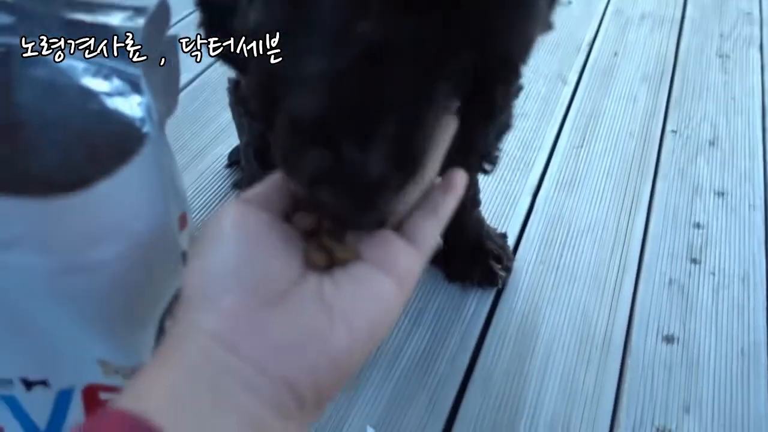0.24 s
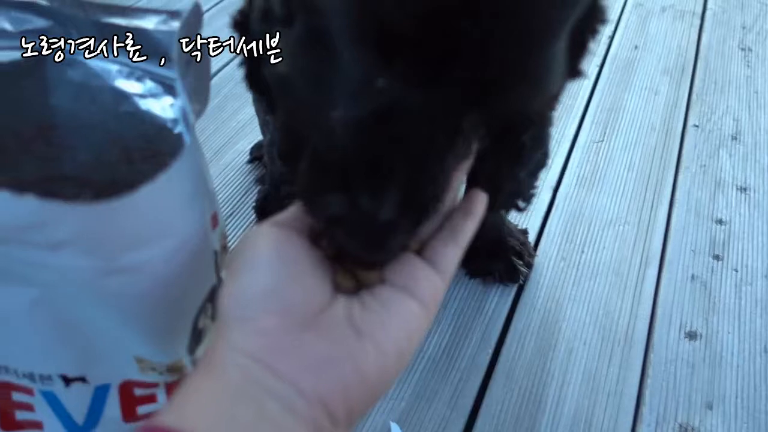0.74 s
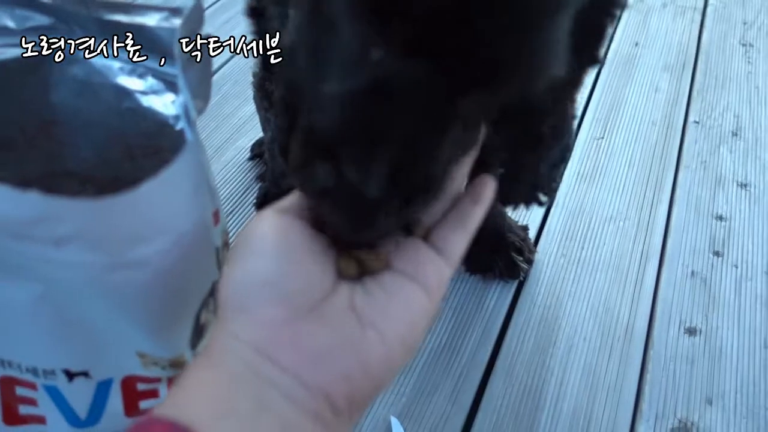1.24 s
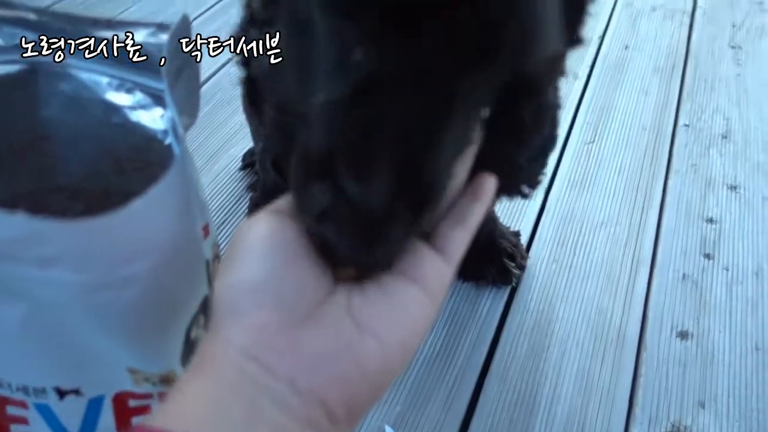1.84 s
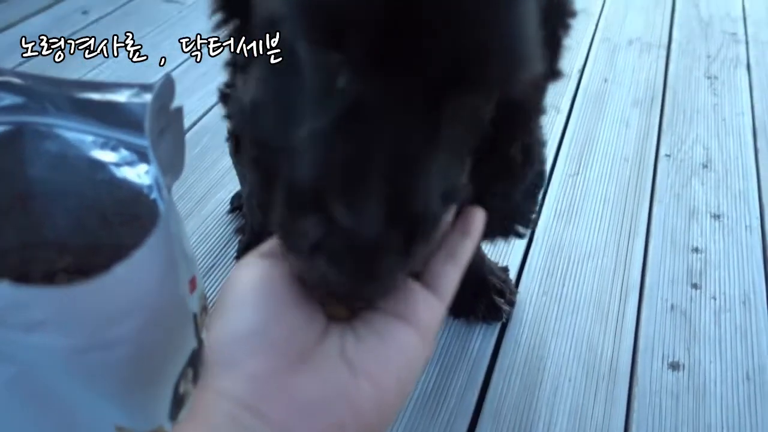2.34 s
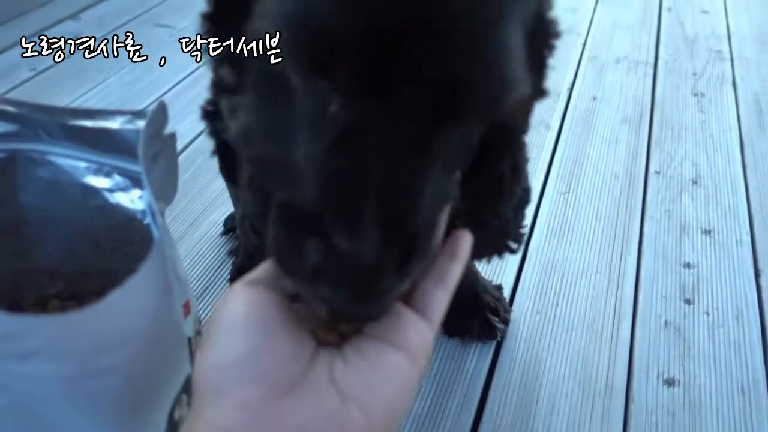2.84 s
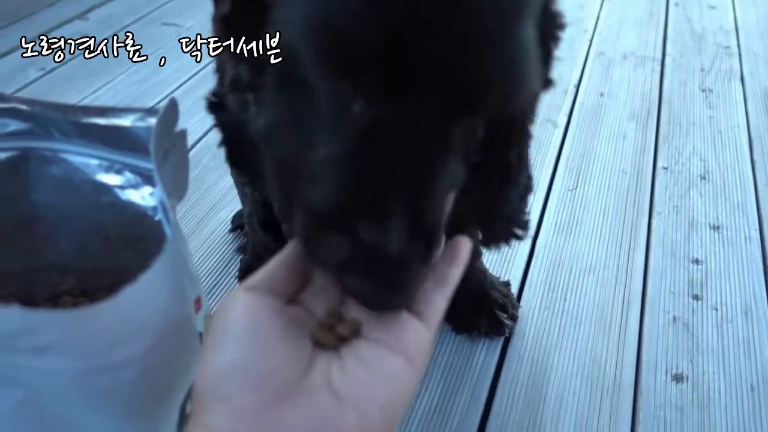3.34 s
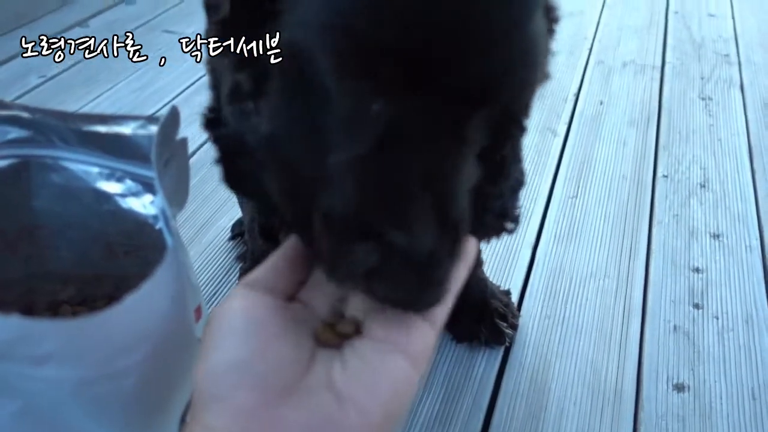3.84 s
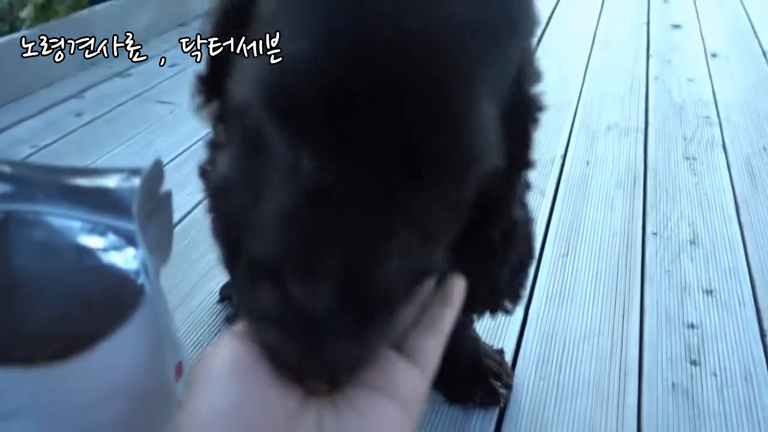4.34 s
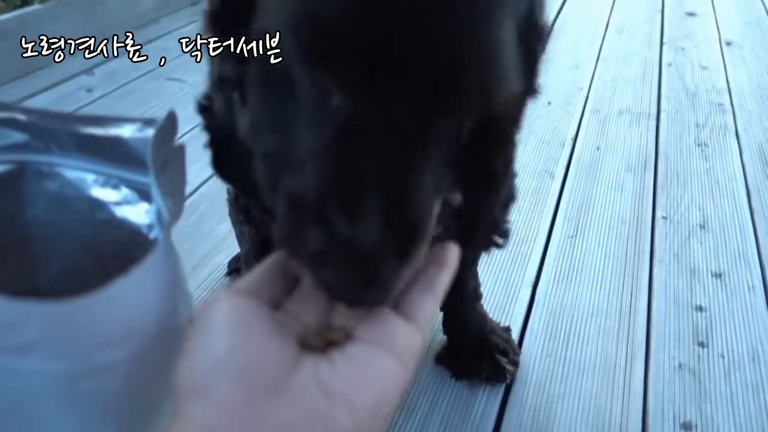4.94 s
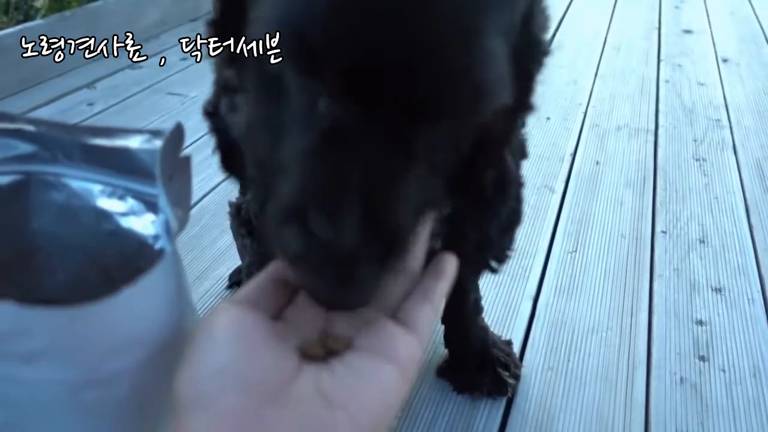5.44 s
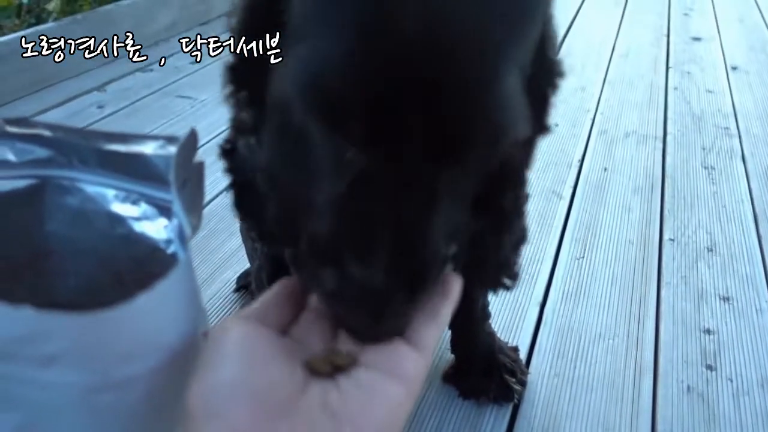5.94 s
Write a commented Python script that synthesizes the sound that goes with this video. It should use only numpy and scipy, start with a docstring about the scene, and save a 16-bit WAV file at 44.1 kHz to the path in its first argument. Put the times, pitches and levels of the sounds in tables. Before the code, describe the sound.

Crisp, close crunches and small wet mouth crackles of a dog eating kibble outdoors, over a soft wash of far traffic.

```python
"""Crisp, close crunches of dry kibble stand out in front throughout: a dog eats from a hand on a wooden deck.
Each bite is a burst of splinter noise ringing resonances of the mouth, cheeks, teeth and jaw.
Around and between the bites run short crackles, built from many tiny decaying sines.
Boards and walls answer with a faint tail of fading noise. Behind lies distant traffic, made of shaped
noise, with a brief far engine hum of harmonics and a thin whine of narrow noise."""
import sys
import numpy as np
from scipy import signal
from scipy.fft import rfft, irfft, next_fast_len
from scipy.io import wavfile
from scipy.ndimage import uniform_filter1d, map_coordinates

SR = 44100
rng = np.random.default_rng(int(sys.argv[2]) if len(sys.argv) > 2 else 0)


def generate_wav(sig):
    """Save sig (samples, or channels by samples) to the path in sys.argv[1] as 16-bit PCM at SR."""
    pcm = np.round(np.clip(np.atleast_2d(sig).T, -1, 1) * 32767).astype(np.int16)
    wavfile.write(sys.argv[1], SR, pcm)


N = 273067  # length in samples


def amp(db):
    """Decibels to gain."""
    return 10 ** (np.asarray(db) / 20)


def unit(x):
    """Scale x to rms 1."""
    return x / np.sqrt(np.mean(x ** 2) + 1e-20)


def along(points, hz):
    """Read a curve of (f/Hz, value) points on a log frequency axis."""
    f, value = np.transpose(points)
    return np.interp(np.log(hz + 1), np.log(f + 1), value)


def curves(rows):
    """One value per sample for each column after the time."""
    t, *columns = np.transpose(rows)
    return [np.interp(np.arange(N) / SR, t, column) for column in columns]


def wobble(rate):
    """A smooth random curve through `rate` knots a second."""
    knots = rng.standard_normal(int(N * rate / SR) + 4)
    return map_coordinates(knots, [np.arange(N) * rate / SR])


def filtered(x, response):
    """Apply a response, given as a function of frequency in Hz."""
    size = next_fast_len(N + SR // 2)
    hz = np.fft.rfftfreq(size, 1 / SR)
    return irfft(rfft(x, size) * response(hz), size)[..., :N]


def causal(gain):
    """The minimum-phase response with this gain: it rings only after the blow."""
    cepstrum = irfft(np.log(gain + 1e-6))
    half = len(cepstrum) // 2
    folded = np.r_[cepstrum[0], 2 * cepstrum[1:half], np.zeros(half)]
    return np.exp(rfft(folded))


def add(track, t, sound):
    """Mix a sound into a track from time t on."""
    start = round(t * SR)
    lo, hi = max(start, 0), min(start + sound.shape[-1], N)
    track[..., lo:hi] += sound[..., lo - start:hi - start]


# likeness of left and right in the traffic: f/Hz, correlation
STEREO_LIKENESS = [(60, 0.52), (140, 0.94), (350, 0.98), (830, 0.87), (2000, 0.35), (4800, 0.026),
                   (11500, 0.043)]
# the traffic's lean to the left: f/Hz, left minus right level/dB
TRAFFIC_LEAN = [(190, 0), (620, 2), (2000, 4.5), (3600, 0.2), (6400, 0)]


def rush(spectrum, patchy_db):
    """Stereo noise, its middle at rms 1, with patches of random gain; it is widest in the treble."""
    grid = signal.stft(rng.standard_normal((2, N)), nperseg=512)[2]
    patches = uniform_filter1d(rng.standard_normal(grid.shape[1:]), size=4, axis=0)  # across frequency
    patches = uniform_filter1d(patches, size=18, axis=1)  # across time
    pair = signal.istft(grid * amp(patchy_db * unit(patches)), nperseg=512)[1][:, :N]

    def mid_and_side(hz):
        turn = np.arccos(np.clip(along(STEREO_LIKENESS, hz), -1, 1)) / 2
        return amp(along(spectrum, hz)) * [np.cos(turn), np.sin(turn)]

    def lean(hz):
        return amp(np.outer([.5, -.5], along(TRAFFIC_LEAN, hz)))

    mid, side = filtered(pair, mid_and_side)
    return filtered(np.array([mid + side, mid - side]), lean) / np.std(mid)


# colours of the three traffic layers: f/Hz, relative level/dB per Hz
RUMBLE_COLOUR = [(15, -70), (25, -57), (80, -68), (113, -19.5), (177, -17), (220, -7), (360, -3), (461, 2),
                 (607, 1), (672, 1), (800, -5), (1040, -72), (1760, -120)]
TYRE_COLOUR = [(470, -37), (800, -6), (872, -3), (945, -1), (1090, -2), (1230, -2), (1330, -3.5),
               (1520, -3), (1860, -2), (2310, -7.5), (2520, -4), (3370, -11.5), (3700, -11), (4250, -9.5),
               (4500, -14), (5850, -55), (9900, -120)]
HISS_COLOUR = [(2650, -9), (4500, -0.5), (5320, -4.5), (6220, -5), (7220, -7), (10600, -10), (11200, -18),
               (14600, -65), (22000, -120)]
# slow rise and fall of rumble and tyre wash, before a small trim: t/s, level/dB
RUMBLE_RIDE = [(0.0, -66.5), (0.55, -64.5), (0.91, -65), (1.84, -62), (2.02, -59.5), (2.5, -62.5),
               (3.1, -58.5), (3.34, -57), (3.52, -56.5), (3.81, -58.5), (4.12, -59), (4.52, -57),
               (4.84, -61), (6.19, -61)]
TYRE_RIDE = [(0.0, -57), (0.4, -57), (1.74, -56.5), (1.9, -55.5), (2.36, -56), (3.19, -53.5), (4.46, -53.5),
             (4.59, -54.5), (5.07, -55), (5.34, -53.5), (6.19, -55)]


def traffic():
    """Distant traffic: low rumble and tyre wash that rise and fall, and an even hiss."""
    rumble_trim_db, tyre_trim_db, hiss_db = 0.5, -0.5, -67
    rumble = amp(curves(RUMBLE_RIDE)[0] + rumble_trim_db) * rush(RUMBLE_COLOUR, patchy_db=2.1)
    tyres = amp(curves(TYRE_RIDE)[0] + tyre_trim_db) * rush(TYRE_COLOUR, patchy_db=2.05)
    hiss = amp(hiss_db) * rush(HISS_COLOUR, patchy_db=2.4)
    return rumble + tyres + hiss


# the far engine's base pitch and its swell: t/s, f/Hz, level/dB before each harmonic's own
HUM_PATH = [(3.15, 135, -72), (3.3, 133, -54), (3.47, 128.3, -49), (3.6, 132, -79), (3.9, 126, -99)]
# the harmonics that sound: multiple of the base pitch, relative level/dB
HUM_HARMONICS = [(3, -6), (4, -12), (5, -14)]


def hum():
    """A far engine swells for a moment out of the traffic: unsteady harmonics of one wavering pitch."""
    pitch_hz, db = curves(HUM_PATH)
    phase = 2 * np.pi * np.cumsum(pitch_hz * (1 + 0.0038 * wobble(24.1))) / SR
    harmonics = sum(amp(level + 0.67 * wobble(7.2)) * np.sin(round(multiple) * phase)
                    for multiple, level in HUM_HARMONICS)
    return amp(db) * harmonics


# swells of the far whine over its resting level: t/s, level/dB before the lean to the left
WHINE_SWELLS = [(3.4, -65), (3.97, -64.5), (6.12, -59)]


def whine():
    """A thin, far whine comes and goes, leaning left: narrow noise under swells that fade in dB."""
    centre_hz, width_hz = 1835, 55
    rest_db, fade_db_per_s = -77, 48  # the fade runs on either side of a swell
    narrow = filtered(rng.standard_normal(N), lambda hz: 1 / (1 + ((hz - centre_hz) / width_hz) ** 4))
    t = np.arange(N) / SR
    swells = sum(amp(db - fade_db_per_s * np.abs(t - peak_s)) for peak_s, db in WHINE_SWELLS)
    return unit(narrow) * (amp(rest_db) + swells) * amp([[2], [-2]])


# how long boards and walls ring: f/Hz, time to fall 60 dB/s
DECK_DECAY = [(200, 0.42), (1500, 0.11), (5000, 0.12), (11000, 0.063)]


def deck(x):
    """A faint, short tail from boards and walls: noise that fades at its own rate in each band."""
    hz, t, grid = signal.stft(rng.standard_normal((2, SR // 3)), SR, nperseg=256)
    fade = amp(-60 * t / along(DECK_DECAY, hz)[:, None])
    tail = signal.istft(grid * fade, SR, nperseg=256)[1]
    return signal.fftconvolve(x, tail / np.linalg.norm(tail[0]), axes=1)[:, :N]


def clump(half_s, pitch_hz, size=160):
    """Tiny wet ticks and crumbs, each a few decaying cycles, thickest two half lengths in."""
    ticks_per_half_second, size_scatter_db, pitch_scatter = 3500, 4.5, .55  # count per second of half length
    t = np.arange(size) / SR
    count = int(ticks_per_half_second * half_s) + 2
    when, pitch, weight = rng.standard_normal((count, 3)).T
    hz = np.clip(pitch_hz * np.exp(pitch_scatter * pitch), 800, 10000)[:, None]
    grains = amp(size_scatter_db * weight)[:, None] * np.sin(2 * np.pi * hz * t) * np.exp(-hz * t / 3.1)
    start = ((2 + np.clip(.7 * when, -2, 2)) * half_s * SR).astype(int)
    ticks = np.bincount((start[:, None] + np.arange(size)).ravel(), grains.ravel())
    return ticks / np.linalg.norm(ticks) * np.sqrt(2 * half_s * SR)  # rms 1 over two half lengths


# short crackles around and between the bites: tongue strokes, grinding crumbs and small lead-in cracks:
# middle t/s, half length t/s, level/dB before the lips' colour, f/Hz
MOUTH_CRACKLES = [(0.131, 0.02, -52, 3470), (.252, .025, -49, 3180), (0.682, 0.0069, -49, 4060),
                  (0.89, 0.013, -48.5, 2380), (1.18, .016, -51.5, 2480), (1.405, .002, -39.5, 2320),
                  (1.863, 0.0095, -49, 2650), (1.962, 0.0097, -45.5, 3430), (2.004, .018, -51.5, 2980),
                  (2.535, 0.036, -50, 1780), (2.964, 0.01, -48.5, 2740), (3.047, 0.016, -44.5, 3000),
                  (3.177, 0.022, -51.5, 1770), (3.371, .012, -57, 6140), (3.431, .003, -47.5, 4140),
                  (3.703, .003, -48, 2700), (4.021, 0.0076, -44, 1800), (4.119, .003, -44, 1400),
                  (4.274, 0.0061, -46.5, 2840), (4.382, 0.03, -52, 2370), (4.826, 0.011, -46, 2970),
                  (5.305, .003, -42, 2920), (5.347, .008, -48, 3240), (5.489, 0.022, -50, 5500),
                  (5.59, 0.037, -50, 4130), (5.584, 0.035, -47.5, 1080), (6.005, 0.013, -51.5, 3080)]
# the lips' colour on the crackle: f/Hz, level/dB
LIPS_COLOUR = [(100, -45), (700, -20), (1050, 0), (1500, -8), (2500, 2), (4600, -1.5), (7000, -3.5),
               (8500, 1), (11000, -13)]


def crackles():
    """Tongue strokes, grinding crumbs, small lead-in cracks and each bite's crumbs pass through the lips."""
    out = np.zeros(N)
    for t, half_s, db, pitch_hz in MOUTH_CRACKLES:
        add(out, t - 2 * half_s, amp(db) * clump(half_s, pitch_hz))
    # crumbs are louder after a hard bite and after a crumbling one, and pitched by the cheeks
    lag_s, half_s, pitch_over_cheek = .007, .0065, 1.096
    base_db, db_per_bite_db, splinter_db = -55, 0.57, 13
    for t, bite_db, _, cheek_hz, *_, share in BITE_SNAPS:
        crumb_db = base_db + db_per_bite_db * bite_db + splinter_db * share
        crumbs = clump(half_s, pitch_over_cheek * cheek_hz)
        add(out, t + lag_s - 2 * half_s, amp(crumb_db) * crumbs)
    return filtered(out, lambda hz: amp(along(LIPS_COLOUR, hz)))


def fracture(t, share, spread_s, apart, scatter_db, scatter_t60):
    """Spectrum of a sharp break amid splinters; fur, hand and boards scatter it differently to each port."""
    tear, common, side = rng.standard_normal((3, len(t)))
    break_s = 0.00021  # the time a crack takes to run through a pellet
    core = tear * np.exp(-np.abs(t) / break_s)
    envelope = np.exp(-np.abs(t) / np.where(t < 0, spread_s * 0.54, spread_s))  # rises faster than it falls
    splinters = np.array([common + apart * side, common - apart * side]) * envelope
    share = np.clip(share, .1, .9)
    core_part = np.sqrt(1 - share) * core / np.linalg.norm(core)
    splinter_part = np.sqrt(share) * splinters / np.linalg.norm(splinters[0])
    burst = rfft(core_part + splinter_part)
    # a break is broadband: its colour comes from the mouth, with only a fine ripple of its own
    power = np.mean(np.abs(burst) ** 2, axis=0)
    burst /= np.sqrt(np.abs(uniform_filter1d(power, size=45)))
    scatter = rng.standard_normal((2, len(t))) * amp(-60 * np.abs(t) / scatter_t60) * (t > .0005)
    return burst + rfft(amp(scatter_db) * scatter / np.linalg.norm(scatter[0]))


# snaps of kibble: t/s, cheek level/dB, mouth f/Hz, cheek f/Hz, mouth level/dB under or over the cheeks,
# tooth level/dB and crack level/dB against their usual levels, splinter share 0-1 (held to .1-.9 in the burst)
BITE_SNAPS = [(0.0074, -0.5, 920, 3170, -10.5, -10, -8, 0), (0.0749, 3.5, 1120, 3900, -22, -3.5, 9.5, 0),
              (0.086, -14, 1190, 3400, -22, -1, 9, 0.7), (0.1072, -2.0, 1030, 3280, -25, -16, -6, 0.26),
              (0.1992, 1.5, 930, 2480, -14, -8, -7.5, 0.3), (0.2284, -2, 970, 2400, -13, -4, -12, 0),
              (0.2457, -4, 990, 2550, -7, 1, 1.5, 0.1), (0.2625, -6.5, 1130, 2410, -7, 3.5, 3.5, 0.4),
              (0.6574, -6.0, 960, 2500, -21, 4, 9.5, 0.23), (0.7611, 5.0, 1240, 3140, -30, -22, 6, 0),
              (0.9048, -6.5, 1050, 2180, -1, -10, -9, 0.5), (1.0244, -2.5, 1360, 2930, -12, -2.5, 5, 0.1),
              (1.1443, 9, 1000, 2580, -6.5, -3.5, -7, 0.1), (1.1555, -3, 1010, 2140, -4, -6, -8, 0.6),
              (1.1991, -5.0, 1010, 2780, -10, -4, -14, 0.13),
              (1.2879, -8.0, 1270, 3080, -11, -2, 5.5, 0.05), (1.409, 8, 1020, 2380, -8, -17, -7, 0.4),
              (1.695, -2, 1090, 2370, 3.5, -4.5, -8, 0.67), (1.7394, -13.5, 1120, 3900, 1, -7, 20, 0.75),
              (2.0936, -5.5, 1320, 3040, -12, -12, 9.5, 0.2), (2.1122, -14.5, 1300, 2840, 3, 3, 12.5, 0.4),
              (2.2213, 3.5, 1070, 2190, -5, -2, -3, 0), (2.229, -5.5, 960, 2380, 13, -1, 6, 0.58),
              (2.2565, -4, 1020, 1820, -4, -10, -4, 0), (2.459, 3, 970, 2160, 8.5, -21, -20, 0.53),
              (2.5013, -4, 1040, 2540, -6, -20, -8, 0.4), (2.5097, -6.5, 1050, 2590, -3, -10, -4, 0.1),
              (2.523, -9.5, 1140, 1940, 7, -14, 5, 0.4), (2.55, -12, 1180, 2130, -2, 1, 2, 0.5),
              (2.5643, -7, 1020, 2340, 5, -9, -8, 0.1), (2.6231, -11, 900, 1840, 4, 7, 3.5, 0.2),
              (2.7236, 15, 950, 1780, 7.5, 2.5, 4, 0.27), (2.736, -3.5, 980, 2100, 8, 3, -6, 0.5),
              (2.7993, 0, 1260, 1350, -10, -5.5, -6, 0.5), (2.853, 0.5, 1050, 2850, 12, -19, 1.5, 0.88),
              (2.9472, -3, 1050, 1700, -1, 1, 2.5, 0.3), (3.0326, -8.5, 1120, 2800, 2, 5.5, 4.5, 0.7),
              (3.0635, 1, 1020, 2560, 0.5, -2, -12, 0), (3.0961, 0.5, 940, 2590, 8, -3, 1.5, 0.87),
              (3.1959, 11.5, 1015, 1360, 3, 5, 0, 0.18), (4.0298, -9.5, 910, 2150, 11, 4, -1, 0.57),
              (4.1743, -7, 1070, 2550, -1, -3, -6, 0), (4.517, 15, 980, 2540, -10, -15, -2, 0.86),
              (4.5774, 1.0, 1270, 2650, -17, -9, -2, 0.03), (4.8188, -8.5, 1130, 2800, 3, 1, -8, 0),
              (4.844, -5.5, 1180, 2750, 5.5, 0, -0.5, 0.2), (5.1843, 9.5, 1225, 2000, 7, 1.5, 2, 0.25),
              (5.2293, 7.5, 1100, 1560, 5.5, 4, 2.5, 0.24), (5.2637, 16.5, 1193, 2020, 6.5, 0, -2.5, 0.26),
              (5.269, -1, 1190, 1870, 7, 6, 9, 0.2), (5.3108, 10, 1230, 1800, 6.5, 5.5, 5, 0.4),
              (5.446, -17.5, 1160, 3550, 3, 10, 20, 0.1), (5.473, -11.5, 1160, 2970, 23.5, 15, 13, 0.07),
              (5.5657, -12, 1100, 2590, 14, -5, 15, 0.9), (5.6964, -5.0, 1220, 2770, -1, -0.5, 2, 0.6),
              (5.7054, -7, 1080, 1330, -3, 8, 10, 0.5), (5.8854, -4, 1370, 2120, 4, -13, 0, 0.1),
              (5.911, -2.5, 1330, 2140, 3, -0.5, 1.5, 0.7), (6.182, 0.5, 1140, 2320, 3.5, 2.5, 0.5, 1)]
# colour of a bare fracture: f/Hz, level/dB
CRACK_COLOUR = [(100, -48), (450, -4.5), (1500, -22), (4000, -13), (5800, 4), (7000, 3), (8500, -0.5),
                (11000, -6)]
# the muzzle sways over the hand: t/s, left minus right level/dB
MUZZLE_SWAY = [(0, .3), (1.1, -1.5), (2.4, 0.5), (3.2, -0.5), (4.5, -.4), (6.19, 0)]


def bites(size=2048):
    """Each fracture rings mouth, cheeks, teeth and jaw; the first two change pitch as the jaw opens."""
    mouth_width_hz, cheek_width_hz, tooth_width_hz = 99, 520, 760  # soft flesh damps all three
    low_tooth_hz, tooth_over_cheek = 3530, 1.3  # in high nips the teeth's note rises with the cheeks'
    usual_tooth_db, usual_crack_db = -6, -22.5  # against the cheeks
    clean_break_s, crumbling_s = 0.0013, 0.0024  # a crumbling pellet splinters for longer
    muzzle_hz = 280  # a small muzzle radiates little bass
    valley_hz, valley_width_hz, valley_db = 780, 56, -7  # a dip below the mouth's note
    out = np.zeros((2, N))
    t = (np.arange(size) - size // 8) / SR  # the break falls at t = 0
    hz = np.fft.rfftfreq(size, 1 / SR)

    def ring(centre_hz, width_hz, db):
        """Power of one resonance."""
        return amp(db) ** 2 / (1 + ((hz - centre_hz) / width_hz) ** 2) ** 2

    jaw_knock = ring(510, 125, -19)  # dull, under the cheeks
    radiation = hz ** 4 / (hz ** 4 + muzzle_hz ** 4)
    valley = amp(valley_db / (1 + ((hz - valley_hz) / valley_width_hz) ** 2))
    # the mouth's low notes build up a moment after the bright edge of the break
    delay_s = 0.00032 / (1 + (hz / 5000) ** 2)
    build_up = np.exp(-2j * np.pi * np.cumsum(delay_s) * hz[1])
    for bite_s, db, mouth_hz, cheek_hz, mouth_db, tooth_db, crack_db, share in BITE_SNAPS:
        tooth_hz = (low_tooth_hz ** 4 + (tooth_over_cheek * cheek_hz) ** 4) ** .25
        bare_db = usual_crack_db + crack_db
        power = ring(mouth_hz, mouth_width_hz, mouth_db) + ring(cheek_hz, cheek_width_hz, 0)
        power += ring(tooth_hz, tooth_width_hz, usual_tooth_db + tooth_db) + jaw_knock
        power += amp(bare_db + along(CRACK_COLOUR, hz)) ** 2
        gain = np.sqrt(power * radiation) * valley + amp(bare_db - 38)  # a floor far under the crack
        blow = fracture(t, share, spread_s=clean_break_s + crumbling_s * share,
                        apart=0.043, scatter_db=-15.5, scatter_t60=0.032)
        snap = irfft(blow * causal(gain) * build_up)
        pan_db = np.interp(bite_s, *np.transpose(MUZZLE_SWAY))
        add(out, bite_s + t[0], snap * amp([[db + pan_db / 2], [db - pan_db / 2]]))
    return out


def scene():
    """The muzzle is a touch nearer the left port, which hears it slightly earlier."""
    lead_s, deck_db = 2e-5, -25.5
    dog = filtered(bites() + crackles(), lambda hz: np.exp(np.outer([1j, -1j], np.pi * hz * lead_s)))
    return traffic() + hum() + whine() + amp(deck_db) * deck(dog) + dog


def record(dry):
    """The microphone thins the bass and cuts off very steeply at its band limit."""
    bass_hz, top_hz = 115, 11200
    thin = signal.sosfilt(signal.butter(1, bass_hz, "highpass", fs=SR, output="sos"), dry)
    return filtered(thin, lambda hz: 1 / np.sqrt(1 + (hz / top_hz) ** 120))


dry = scene()
out = record(dry)
generate_wav(out)
```